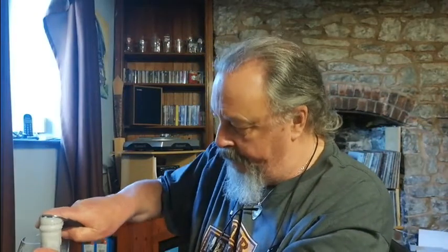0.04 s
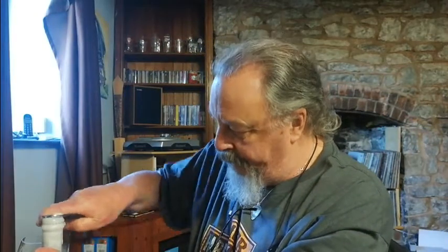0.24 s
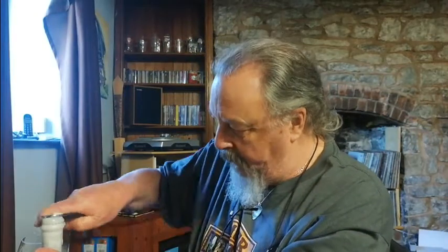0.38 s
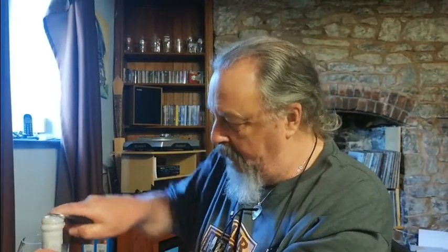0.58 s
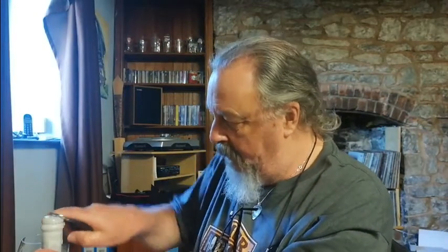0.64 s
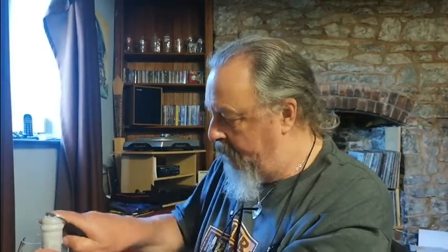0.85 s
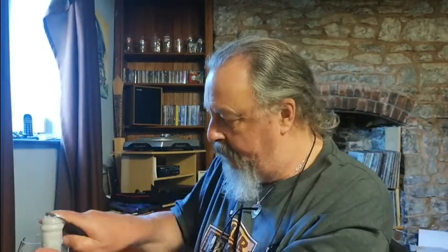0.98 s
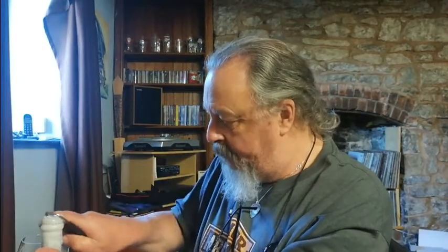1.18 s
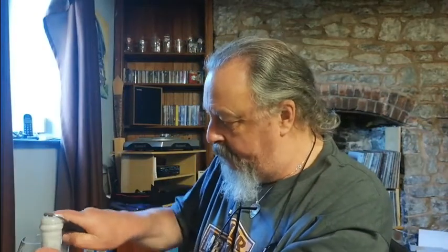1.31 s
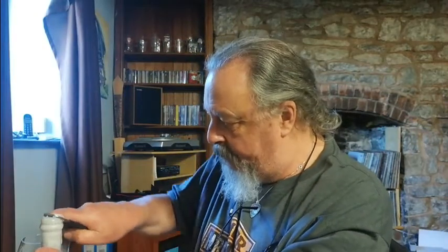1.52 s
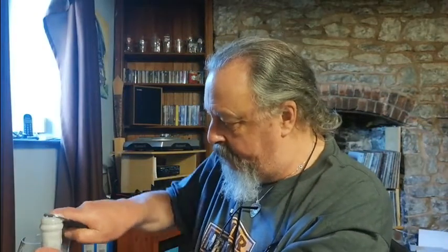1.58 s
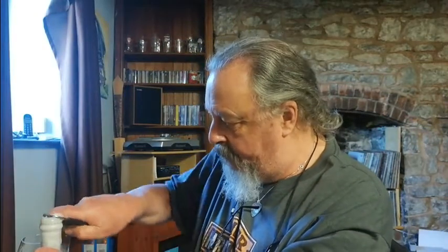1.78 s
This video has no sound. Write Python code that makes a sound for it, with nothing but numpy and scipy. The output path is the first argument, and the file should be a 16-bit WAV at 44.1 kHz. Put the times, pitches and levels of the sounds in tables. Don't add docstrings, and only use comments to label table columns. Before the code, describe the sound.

A steel opener snaps sharply against a sealed bottle top, knocking a wooden table, in a room

```python
import sys
import numpy as np
from scipy import signal
from scipy.fft import rfft, irfft
from scipy.io import wavfile
from scipy.ndimage import uniform_filter1d

SR = 44100
rng = np.random.default_rng(int(sys.argv[2]) if len(sys.argv) > 2 else 0)


def gain_from_db(level_db):
    decades = np.asarray(level_db, float) / 20
    return 10 ** decades


def transcribe(u):
    v = np.clip(np.atleast_2d(u).T, -1, 1)
    q = np.round(v * 32767).astype(np.int16)
    wavfile.write(sys.argv[1], SR, q)


N = 81585

# start in [s], level in [dB], left over right in [dB],
# crack colour [index, rounded; negatives count from the end], room level in [dB].
TICKS = [(.1351, -33.5, -15, 1, -1.5), (0.2005, -6, -5.5, 0, 3), (0.228, -10, -9, -2.5, -15),
         (0.233, -21, -8, 0, 2), (0.3627, -37, -16, -1.5, -1), (.507, -48.5, -5, 3, 3.5),
         (1.3747, -39, -7, 3, 5.5), (1.563, -27, -9.5, 2, 6.5), (1.581, -33, -14, 2, -3),
         (1.601, -44, -19, 2, -8), (.598, -51, -8, -3.5, 0)]
# frequency in [Hz], level in [dB].
SNAP_COLOUR = [(800, -23.5), (2100, -11.5), (3300, -3), (4300, -13), (5800, -3.5), (8800, -2),
               (10800, -4.5), (13000, -34.5)]
LIGHT_COLOUR = [(2000, -28), (4000, -15), (5500, -9), (7000, -22), (8800, 2), (10500, 9), (13000, -6),
                (15500, -23)]
THIN_COLOUR = [(2200, -46), (3300, -12), (5000, -10.5), (7500, -11), (10000, 7.5), (11500, -5.5),
               (13500, -4), (15500, -24)]
DULL_COLOUR = [(2200, -37), (3100, -10), (4000, 1), (5500, -17), (7500, -3), (9600, 5.5), (12000, -13),
               (15500, -19)]
# frequency in [Hz], level in [dB], T60 in [s], rise time in [s].
TABLE_MODES = [(34.5, -16, 0.36, .05), (68.5, -7.5, 0.39, 0.058), (97.7, -3, 0.3, 0.045),
               (134.7, 2, 0.29, 0.028), (128.75, -4, 0.26, 0.039), (152.5, -11, 0.25, .02),
               (206.7, -15.5, 0.33, .01), (260.4, -20.5, 0.42, 0.06), (327.1, -8, 0.24, 0.019),
               (340.7, -12, 0.25, 0.013), (427.3, -7.5, 0.23, 0.0051), (454.6, -9, 0.2, .008),
               (504.5, -7, 0.16, 0.005), (652, -13.5, 0.16, 0.0041)]
# start in [s], level in [dB], ring in [Hz], T60 in [s].
THUDS = [
    (.565, -50, 132, 0.13),
    (0.603, -56.5, 236, 0.17),
    (0.698, -56, 216.2, 0.17),
    (0.711, -54, 125, 0.224),
    (0.754, -57.5, 234, 0.214),
    (.757, -60.5, 490, 0.09),
    (1.035, -47.5, 98, 0.085),
]
# start in [s], level in [dB], ring in [Hz], T60 in [s].
CLINKS = [
    (0.606, -49, 1453, 0.024),
    (.6062, -54.5, 2895, 0.025),
    (.6062, -57.5, 4000, 0.0092),
    (0.6063, -52.5, 596, 0.0094),
    (.613, -51, 1360, 0.013),
    (0.6238, -49, 1636, 0.056),
    (0.623, -56, 3000, .015),
    (.65, -61.5, 1650, 0.13),
    (.685, -64.5, 1648, 0.21),
    (0.698, -65, 1410, .1),
]
# delay in [s], left level in [dB], right level in [dB].
ECHOES = [(.001, -1, 3), (.003, -11, -1.5), (.0064, -14, -0.5), (.0072, -26, -0.5), (.0086, -6, -15.5),
          (.0094, 2.5, -12), (.013, -27, -5), (0.0155, -9, -12), (0.0235, -26, -1)]
# frequency in [Hz], T60 in [s].
TAIL_T60 = [(100, 0.25), (500, 0.6), (2000, .27), (3500, 0.25), (6000, .22), (10000, 0.22), (15000, 0.25)]
# frequency in [Hz], density in [dB per Hz].
AIR_SPECTRUM = [(20, -1), (65, -6.5), (163, -18), (357, -20.5), (520, -29), (1150, -23), (9800, -31.5),
                (13000, -38)]
# frequency in [Hz], correlation [-1 to 1].
AIR_LIKENESS = [(60, 1), (130, 0.74), (290, 0), (640, -0.59), (1410, 0.2), (3100, 0.07), (6820, -0.0),
                (15000, -0.01)]
# start in [s], length in [s], lower edge in [Hz], depth in [dB].
HUSH = [
    (0.1808, 0.015, 390, -28),
    (1.545, 0.012, 8500, -25),
]


def at_hz(points, hz):
    table_hz, value = np.array(points).T
    return np.interp(np.log(hz), np.log(table_hz), value)


def decay(t60_s, t):
    return np.exp(-np.log(1000) * t / t60_s)


def ring(hz, t60_s, t):
    return np.sin(2 * np.pi * hz * t) * decay(t60_s, t)


def band(x, hz):
    edges_hz = [hz / 2 ** .25, min(hz * 2 ** .25, SR * .45)]
    return signal.sosfilt(signal.butter(2, edges_hz, "band", fs=SR, output="sos"), x)


def add(out, x, start_s):
    i = int(round(start_s * SR))
    x = x[..., :N - i]
    out[..., i:i + x.shape[-1]] += x


def sides(pan_db):
    return gain_from_db(np.array([[pan_db], [-pan_db]]) / 2)


def colour(points):
    hz = np.maximum(np.arange(257) * SR / 512, 1)
    cepstrum = irfft(at_hz(points, hz) * np.log(10) / 20)
    cepstrum[1:256] *= 2
    cepstrum[257:] = 0
    return irfft(np.exp(rfft(cepstrum)))


def opener(early, tail):
    crack_t60_s, crack_db, tail_db, port_lag_s = 0.0016, -5.5, -17, .00014
    out, t = np.zeros((2, N)), np.arange(SR // 200) / SR
    noise = rng.standard_normal((len(TICKS), len(t)))
    direct = 1. * (np.arange(early.shape[1]) == 0)
    colours = (SNAP_COLOUR, LIGHT_COLOUR, THIN_COLOUR, DULL_COLOUR)
    for (start_s, db, pan_db, kind, room_db), burst in zip(TICKS, noise):
        crack = (t == 0) + gain_from_db(crack_db) * burst * decay(crack_t60_s, t)
        crack = np.convolve(crack, colour(colours[round(kind)]))
        crack = crack * gain_from_db(db) / np.sqrt(np.sum(crack ** 2))
        wet = (early + gain_from_db(tail_db) * tail) * sides(pan_db)
        path = direct * sides(pan_db) + gain_from_db(room_db) * wet
        left, right = signal.fftconvolve(crack[None], path)
        add(out[0], left, start_s)
        add(out[1], right, start_s + port_lag_s)
    return out


def table(tail):
    knock_s, knock_db, lag_s, pan_db = .2035, -24.5, 0.00086, -8
    rattle_db, rattle_top_hz, thud_rise_s = -47.5, 680, 0.0083
    out, t = np.zeros((2, N)), np.arange(SR // 2) / SR
    for hz, db, t60_s, rise_s in TABLE_MODES:
        high = min(hz / 400, 1) ** 2
        port_lag_s = np.array([[0], [lag_s * high]])
        swell = gain_from_db(knock_db + db) * (1 - np.exp(-t / rise_s)) * sides(pan_db * high)
        add(out, swell * ring(hz, t60_s, np.maximum(t - port_lag_s, 0)), knock_s)
    soft = signal.butter(2, rattle_top_hz, fs=SR, output="sos")
    add(out, gain_from_db(rattle_db) * 10 * signal.sosfilt(soft, tail), knock_s)
    for start_s, db, hz, t60_s in THUDS:
        rise = 1 - np.exp(-t / thud_rise_s)
        add(out, gain_from_db(db) * rise * ring(hz, t60_s, t), start_s)
    return out


def glass(tail):
    wet_db, pan_db = -4, -9
    out, t = np.zeros((2, N)), np.arange(SR // 4) / SR
    for start_s, db, hz, t60_s in CLINKS:
        clink = gain_from_db(db) * ring(hz, t60_s, t)[None]
        add(out, clink * sides(pan_db), start_s)
        add(out, gain_from_db(wet_db) * signal.fftconvolve(clink, tail) / 10, start_s)
    return out


def room():
    tail_rise_s = .003
    t = np.arange(SR // 2) / SR
    early = np.zeros((2, len(t)))
    for delay_s, left_db, right_db in ECHOES:
        early[:, int(delay_s * SR)] += gain_from_db([left_db, right_db]) * rng.choice([-1, 1], size=2)
    noise = rng.standard_normal((2, len(t)))
    tail = np.zeros((2, len(t)))
    for hz in 125 * 2 ** np.arange(0, 7.3, .5):
        tail += band(noise, hz) * decay(at_hz(TAIL_T60, hz), t)
    return early, tail * (1 - np.exp(-t / tail_rise_s))


def walk(rate_hz):
    k = int(SR / rate_hz)
    steps = np.repeat(rng.standard_normal(N // k + 1), k)
    return 1.3 * uniform_filter1d(uniform_filter1d(steps, k), k)[:N]


def air():
    level_db, top_hz, flicker_db, rumble_db = -63.5, 15500, 1, 3.5
    out = np.zeros((2, N))
    for hz in 22 * 2 ** np.arange(0, 9.7, .5):
        like = np.clip(at_hz(AIR_LIKENESS, hz), 0, 1)
        mid, side = band(rng.standard_normal((2, N)), hz)
        drift_db = rumble_db if hz < 300 else flicker_db
        db = at_hz(AIR_SPECTRUM, hz) + drift_db * walk(7.93)
        stereo = np.sqrt(1 + like) * mid + np.sqrt(1 - like) * side * np.array([[1], [-1]])
        out += gain_from_db(db) * stereo
    out = signal.sosfilt(signal.ellip(6, 1, 40, top_hz, fs=SR, output="sos"), out)
    return out * gain_from_db(level_db) / np.sqrt(np.mean(out.mean(axis=0) ** 2))


def scene():
    early, tail = room()
    return opener(early, tail) + table(tail) + glass(tail) + air()


def top_cut(x):
    return signal.sosfilt(signal.butter(12, 16490, fs=SR, output="sos"), x)


def record(dry):
    t = np.arange(N) / SR
    for start_s, length_s, hz, db in HUSH:
        treble = signal.sosfiltfilt(signal.butter(4, hz, "high", fs=SR, output="sos"), dry)
        gate = 1. * ((t > start_s) & (t < start_s + length_s))
        gate = uniform_filter1d(gate, size=60)
        dry = dry - (1 - gain_from_db(db)) * gate * treble
    return top_cut(dry)


dry = scene()
out = record(dry)
transcribe(out)
```